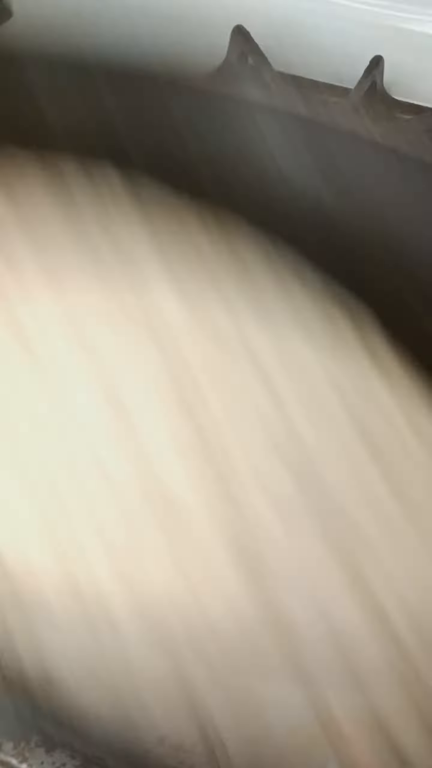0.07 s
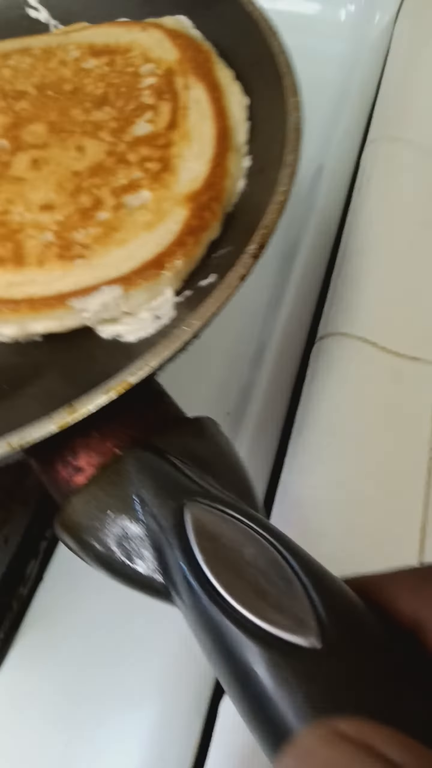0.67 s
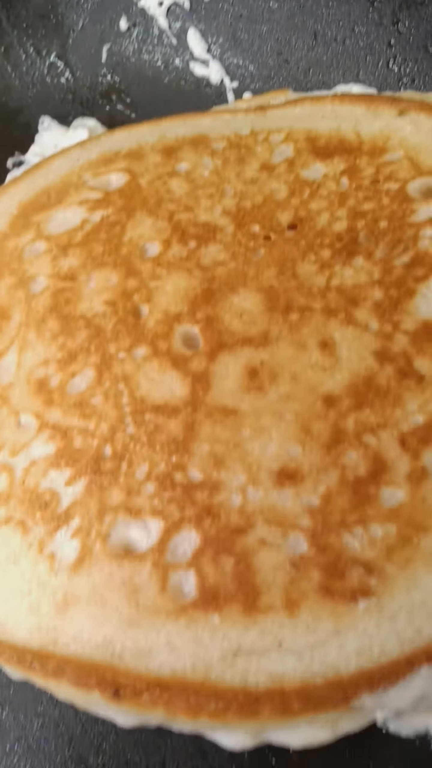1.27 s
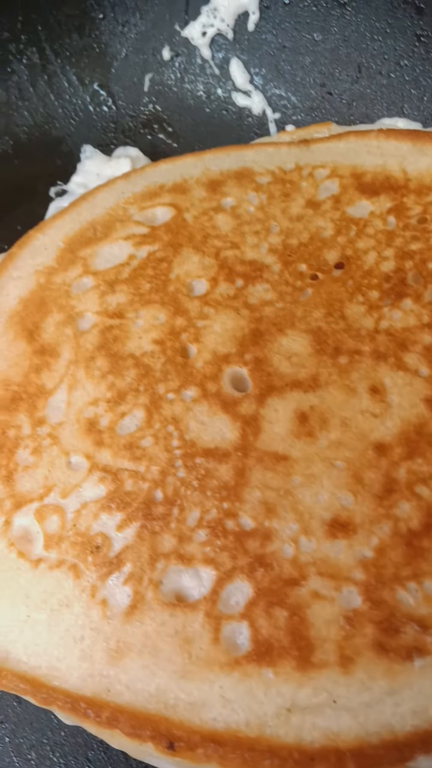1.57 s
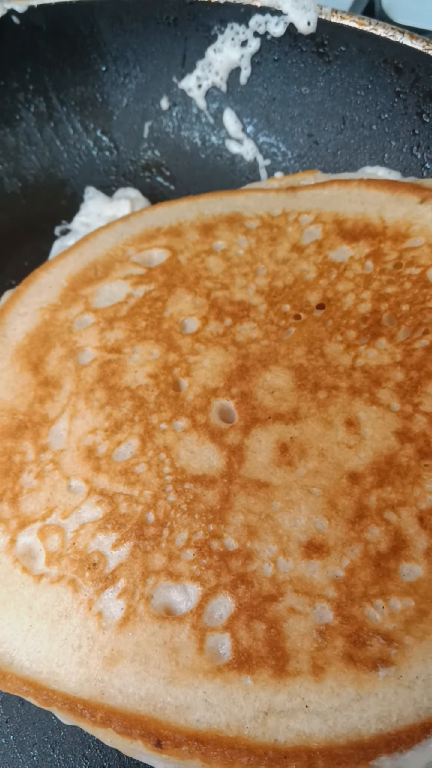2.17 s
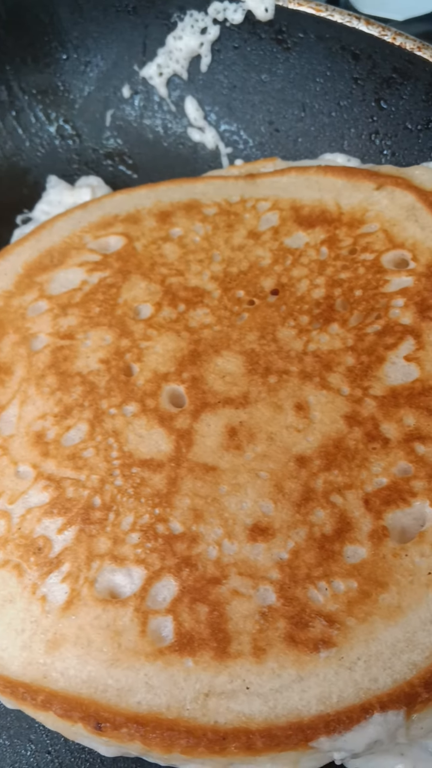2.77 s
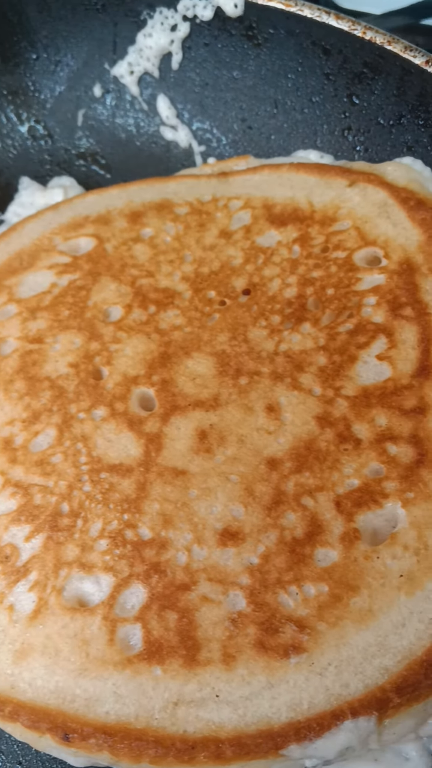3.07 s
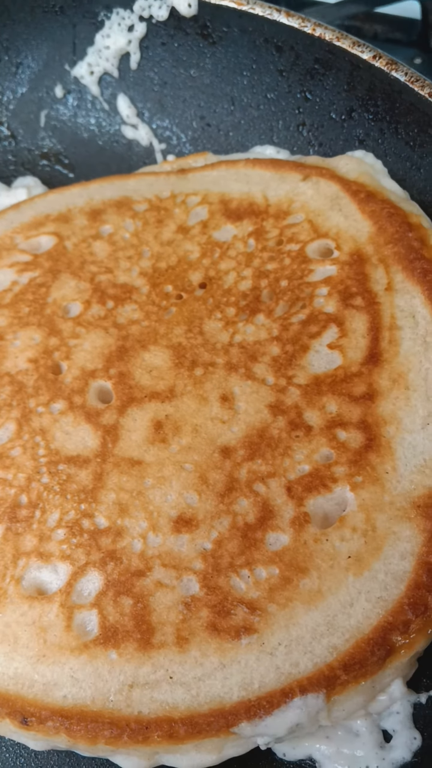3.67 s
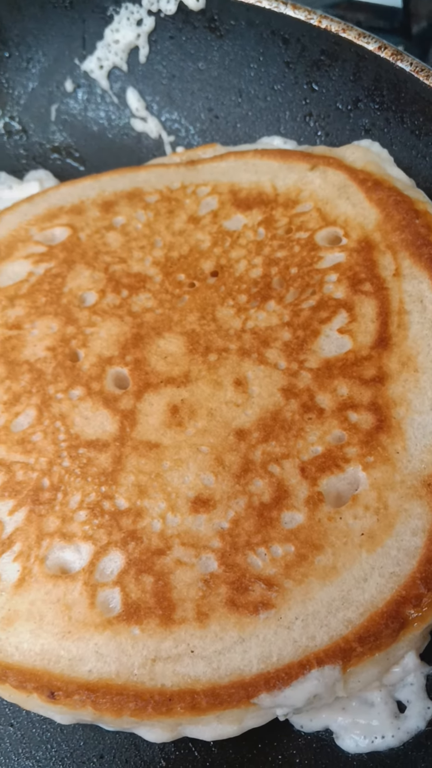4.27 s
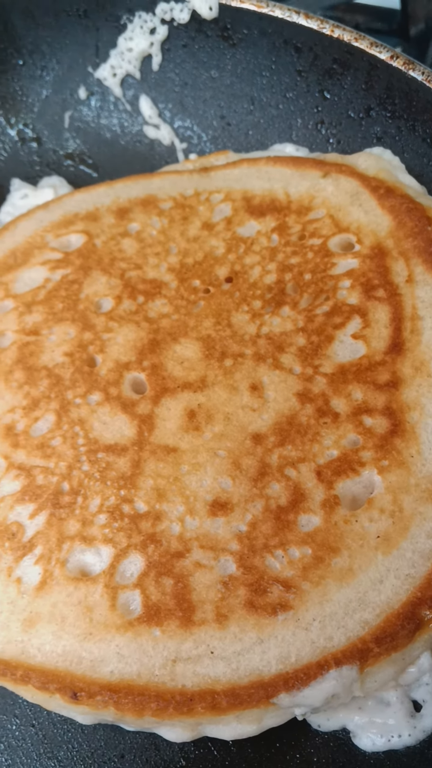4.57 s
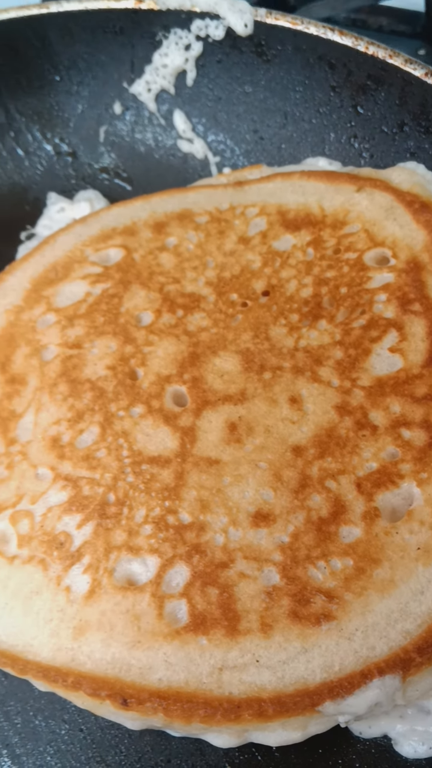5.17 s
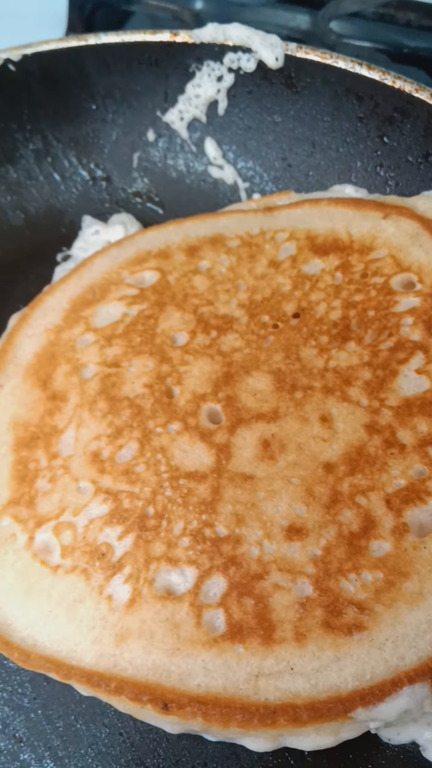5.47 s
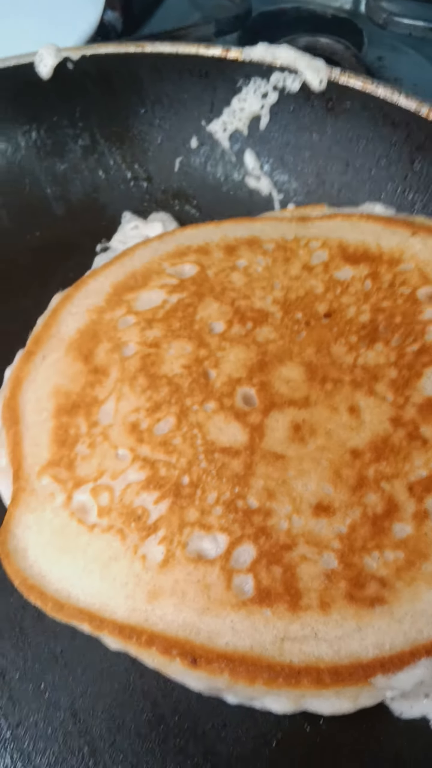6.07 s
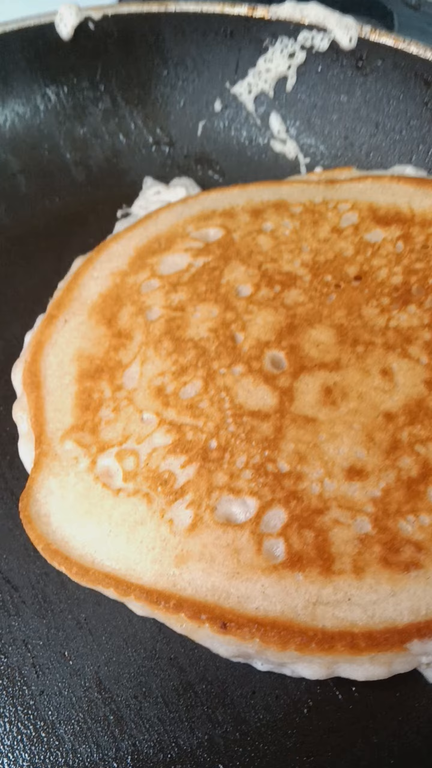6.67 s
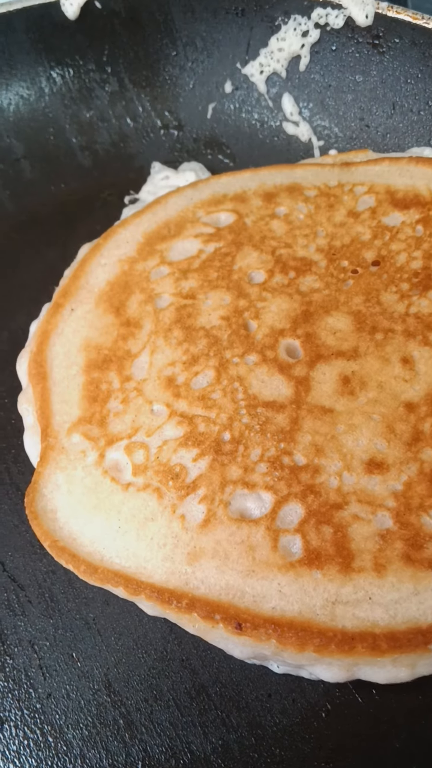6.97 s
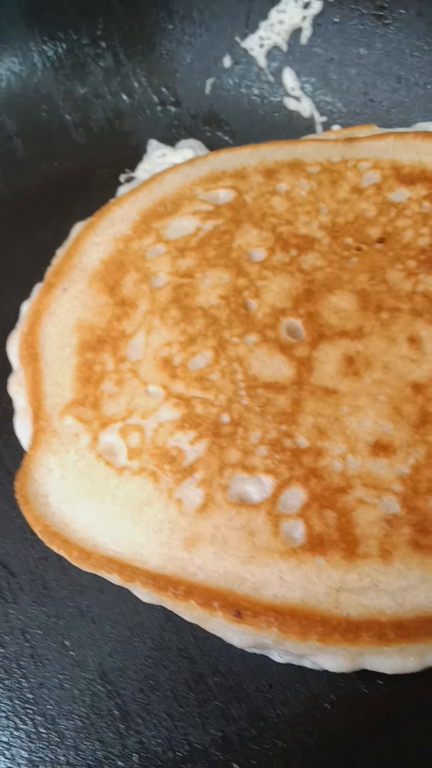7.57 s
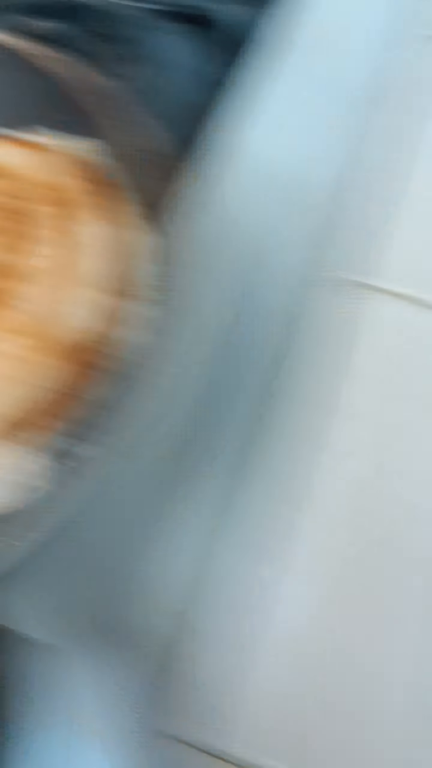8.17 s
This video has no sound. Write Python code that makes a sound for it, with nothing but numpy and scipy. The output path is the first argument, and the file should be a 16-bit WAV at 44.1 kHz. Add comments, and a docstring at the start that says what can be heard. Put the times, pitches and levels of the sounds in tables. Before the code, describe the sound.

A quick rasp and slap of a flipped pancake, then bright sizzling that gradually eases, and the pan briefly bumps the stove grate.

```python
"""A pancake rasps up a frying pan, flies, and lands wet side down with a slap that rings the metal.
The batter sizzles with thousands of bursting bubbles and slowly calms as it dries; single large bubbles
spit. Later the pan bumps on the iron grate and the stove thuds under it. A kitchen hums behind.
The left microphone of a hand-held phone faces the pan, until the phone turns away at the end."""
import sys
import numpy as np
from scipy import signal
from scipy.fft import rfft, irfft, next_fast_len
from scipy.io import wavfile
from scipy.ndimage import uniform_filter1d, map_coordinates

SR = 44100
rng = np.random.default_rng(int(sys.argv[2]) if len(sys.argv) > 2 else 0)


def unload_audio(sound):
    """Save the sound as a 16-bit wav file, at the path given as the first command line argument."""
    columns = np.transpose(np.atleast_2d(sound))
    # keep every value between -1 and 1, then stretch to whole-number steps
    steps = np.round(np.clip(columns, -1, 1) * 32767)
    wavfile.write(sys.argv[1], SR, steps.astype(np.int16))


N = 371322

# batter hitting the pan: (time [s], relative level [dB])
SLAPS = [(0.0938, -16), (0.2097, -18), (0.389, -18), (0.4197, -13), (0.4297, -9.5), (0.437, -.5),
         (0.4386, -6), (.469, -17)]
# wet batter spreading on hot metal: (frequency [Hz], gain [dB])
SQUELCH_EQ = [(40, -42), (90, -8), (210, -12), (350, -17.5), (550, -11.5), (750, -7), (980, -8),
              (1200, 0.5), (1550, -7.5), (2200, -10), (3200, -17.5), (4000, -12.5), (6000, -15.5),
              (8000, -10), (15800, -20.5)]
# the pan shivering under the landed cake: (frequency [Hz], gain [dB])
SHIVER_EQ = [(900, -31), (1500, -12), (1900, 2.5), (2300, -11), (3100, -17), (4000, -3.5), (4800, -13),
             (7000, -20), (10000, -10), (15800, -20)]
# the pan's ring under the cake: (frequency [Hz], level [dB], t60 [s])
LOADED_PAN_MODES = [(1220, -5, 0.09), (1820, -1, 0.2), (2100, -1, .12), (2670, -11, 0.089), (4050, 5, .13),
                    (4300, -7, 0.19)]
# draw back, push, flick: (time of top speed [s], relative rasp [dB], rub [dB], rasp half-width [s])
STROKES = [(0.015, -31, -31.5, 0.03), (.096, -30.5, -31.5, 0.0174), (.144, -17.5, -37.5, 0.0262)]
# the crust's bright rasp: (frequency [Hz], gain [dB])
RASP_EQ = [(80, -36), (200, -13.5), (500, -14.5), (1000, -13), (1600, -5), (2300, -10), (3000, -8),
           (4200, -4.5), (5500, -1), (7100, 2), (11000, 0), (14000, -8), (15800, -16)]
# the dull rub beneath it: (frequency [Hz], gain [dB])
RUB_EQ = [(150, -23), (600, -13), (1000, -2), (1500, -2), (2300, 0), (3500, -9.5), (7000, -33)]
# the pan's ring in the skid: (frequency [Hz], level [dB], t60 [s])
PAN_MODES = [(679, -8.5, 0.34), (1750, -2, 0.076), (2210, -2.5, .22), (4640, -12, 0.16), (5070, -8, .1),
             (5760, 10, 0.062), (6047, -5, 0.081), (6300, -2, 0.088), (6750, 15, 0.065), (7000, 2, .08),
             (7600, 5, 0.088), (7660, -5, .08), (8660, 10, 0.081), (9200, -5, .1), (10100, 1, 0.12),
             (10100, 0, 0.1), (10857, 1, 0.12), (11400, -7, .11)]
# tiny bubbles bursting: (frequency [Hz], gain [dB])
SIZZLE_EQ = [(1500, -33.5), (2500, -12), (3600, -10.5), (4600, -7.5), (5600, -5.5), (7000, -2.5),
             (8100, 1.2), (10000, 0.8), (11200, -2), (12200, -2), (13400, -5.5), (15800, -6.5)]
# steam trapped under the cake: (frequency [Hz], gain [dB])
STEAM_EQ = [(300, -29), (600, -5.5), (1000, 1), (1400, 0.5), (2100, -2.5), (3000, -9.5), (5000, -15),
            (9000, -48)]
# brief swells and dips in the frying; the one after the knock is the pan scraping on the grate:
# (time [s], sizzle gain [dB], steam gain [dB], half-width [s])
SWELLS = [(5.5, 2, -1, 0.18), (6.21, 1.2, 4.5, 0.08), (7.8, -1, 0.5, 0.25)]
# the largest bubbles: (time [s], relative left level [dB], relative right level [dB], pitch [Hz])
SPITS = [(.326, -29, -40, 8950), (0.747, -21, -42, 9050), (1.1738, -27, -45, 8830),
         (1.2117, -23, -27, 10800), (1.3344, -21, -38, 9700), (1.4431, -22.5, -30, 10600),
         (1.5525, -25, -28, 12000), (1.6935, -29, -45, 9380), (1.849, -23, -42, 9080),
         (2.176, -31, -45, 8150), (2.3782, -35, -45, 8300), (2.6868, -36, -33, 9170),
         (2.9221, -28, -45, 9000), (3.3369, -27.5, -45, 8640), (3.3774, -37, -44, 4400),
         (3.9055, -34, -48, 9770), (4.7815, -36, -37, 9570), (5.462, -31, -48, 8680),
         (5.534, -31, -48, 9000), (6.21, -33, -48, 8940), (6.2536, -32.5, -33, 7500),
         (6.293, -33, -45, 8450), (6.5947, -31.5, -46, 9000), (7.3358, -26, -38, 9000),
         (7.6655, -40, -42, 5970), (7.8053, -31.5, -48, 8900)]
# pan against grate, darker when soft: (time [s], thud [dB], relative clack [dB], top of the thud [Hz])
BUMPS = [(.092, -32.5, -42, 152), (.4375, -34.5, -28, 450), (5.703, -35, -75, 98), (5.981, -37, -70, 170),
         (6.0045, -37, -19, 300), (6.083, -46, -33.5, 300), (6.089, -34, -36, 450), (6.182, -62, -45, 300)]
# the iron grate: (frequency [Hz], level [dB], t60 [s])
GRATE_MODES = [(328.3, -18, 0.44), (458.5, -17.5, 0.52), (700, 0, 0.063), (790, 2, 0.029),
               (940, -4.5, 0.036), (1090, -27, 0.18), (1327, -23, .25)]
# the stove's sheet-metal body: (frequency [Hz], level [dB], t60 [s])
STOVE_MODES = [(88, -19, .06), (114, -3, 0.082), (180, 0.5, 0.063), (210, 1.5, 0.045), (289, -3, 0.058)]
# the clack of the contact: (frequency [Hz], gain [dB])
CLACK_EQ = [(40, -47), (150, -19), (400, -5), (560, -5), (750, -0.5), (1000, -4), (1500, -17.5),
            (2500, -29), (5000, -46)]
# the appliances' low drone: (frequency [Hz], gain [dB])
DRONE_EQ = [(20, -61), (38, -43), (55, -11), (85, -1), (125, 0), (170, 0), (210, -4), (260, -6.5),
            (370, -9), (460, -17.5), (600, -15.5), (900, -17), (1500, -37.5)]
# their hum: (frequency [Hz], level [dB])
HUM_TONES = [(59.2, -62), (86.1, -65.5), (118.4, -63), (172, -61), (293, -73), (355.3, -71.5), (527.6, -64)]
# faint steady hiss: (frequency [Hz], gain [dB])
HISS_EQ = [(400, -2.5), (900, 1), (2000, -9), (3300, -11), (4600, -9), (7000, -6.5), (11000, -9.5),
           (15800, -11.5)]
# the kitchen's reverb: (frequency [Hz], t60 before stretching [s])
KITCHEN_DECAY = [(150, 0.4), (1000, 0.25), (4000, 0.38), (14000, 0.1)]
# the right microphone turning to face the pan: (time [s], share [0-1])
TURN = [(0, 0.08), (7.85, 0.06), (8.05, 1), (8.2, 0.9), (8.42, 0.3)]
# flip and knocks on the shaded right side: (frequency [Hz], gain [dB])
KNOCK_SHADE = [(60, 1), (200, -5.5), (450, -8.5), (750, -15.5), (1200, -15.5), (2300, -9.5), (3200, -12),
               (4400, -9), (8000, -10.5), (11000, -12), (15000, -15)]
# frying on the right before the turn: (frequency [Hz], gain [dB])
SIZZLE_SHADE = [(400, -11.5), (800, -22), (1300, -21), (2400, -13), (3200, -12.5), (4400, -6), (6000, -9.5),
                (8000, -18.5), (11000, -15), (15000, -9)]
# frying on the right when fully turned: (frequency [Hz], gain [dB])
FACING_SHADE = [(400, -17), (1200, -16), (2200, -2), (3300, -18), (6000, -28), (9000, -2), (12000, -22),
                (15000, -24)]

LANDING_S, AWAY_S = .438, 8.03  # the cake lies flat; the phone turns away
SQUELCH_DB, SQUELCH_RISE_DB_PER_S, SQUELCH_FALL_DB_PER_S = -25, 330, 520
SHIVER_DB, SHIVER_FALL_DB_PER_S = -27, 300
EMPTY_SIZZLE_DB, EMPTY_STEAM_DB = -49, -55.5  # fat frying before the landing
SIZZLE_DB, SIZZLE_FRESH_DB, SIZZLE_CALM_S = -52, 18.5, 1.76  # settled, boost when wet, drying time constant
STEAM_DB, STEAM_FRESH_DB, STEAM_CALM_S = -61, 10.5, 2.92
CATCH_S = 0.045  # time constant of the batter starting to fry
SIZZLE_AWAY_DB_PER_S, STEAM_AWAY_DB_PER_S = 22, 4  # the treble fades fastest
SPRAY_PER_S, SPRAY_OVER_DB, SPRAY_SPREAD_DB, SPRAY_HZ = 8, 9, 1, 8340
CHATTER_S, CHATTER_GAP_S, CHATTER_LOSS_DB = 6.014, .018, 3.5  # the pan rocks after the hardest knock
TOP_HZ = 15950


def landing():
    """The wet side touches in a few slaps that ring the pan, and squeezes out air and steam."""
    since = np.arange(N) / SR - LANDING_S
    squelch_db = SQUELCH_DB - np.maximum(-SQUELCH_RISE_DB_PER_S * since, SQUELCH_FALL_DB_PER_S * since)
    track = amp(squelch_db) * unit(coloured(grains(rate=5000, spread_db=2), SQUELCH_EQ))
    shiver = (since > 0) * amp(SHIVER_DB - SHIVER_FALL_DB_PER_S * np.abs(since))
    track += shiver * unit(coloured(rng.standard_normal(N), SHIVER_EQ))
    for s, db in SLAPS:
        add(track, s, amp(db + 1) * crest(coloured(snap(splash=0.24, t60=0.0068), SQUELCH_EQ)))
        add(track, s, amp(db - 29) * crest(ring(LOADED_PAN_MODES, attack=.0005)))
    return track


def skid():
    """The crust catches and slips on the pan: a rasp over a dull rub, and the metal rings on."""
    friction = sum(amp(db) * swell(s, half) for s, db, _, half in STROKES)
    pressure = sum(amp(db) * swell(s, 1.12 * half) for s, _, db, half in STROKES)  # outlasts the rasp
    slips = friction * grains(rate=14000, spread_db=3.5)
    rasp = coloured(slips, RASP_EQ)
    metal = signal.oaconvolve(slips, ring(PAN_MODES, attack=.0001))[:N]
    track = np.std(slips) * (amp(2.5) * unit(rasp) + amp(-4.5) * unit(metal))
    track += pressure * unit(coloured(grains(rate=4000, spread_db=3), RUB_EQ))
    # as the cake leaves, the pan springs back in its lowest mode
    add(track, .145, amp(-38.5) * crest(ring(PAN_MODES[:1], attack=0.011)))
    return track


def frying(sizzle_db, steam_db):
    """Thousands of bursting bubbles fizz, fewer and larger ones crackle; trapped steam sputters lower."""
    fizz = patchy(grains(rate=16000, spread_db=2.5), depth_db=1.2) * amp(0.6 * wobble(35))
    pops = grains(rate=300, spread_db=5.5)
    crackle = amp(-5) * unit(signal.oaconvolve(pops, snap(splash=0.46, t60=0.0068))[:N])
    sizzle = amp(sizzle_db) * unit(coloured(fizz + crackle, SIZZLE_EQ))
    steam = amp(steam_db) * unit(coloured(grains(rate=4000, spread_db=3), STEAM_EQ))
    return sizzle + steam


def frying_levels():
    """Sizzle and steam envelopes in dB: both leap at the landing and calm as the batter dries."""
    t = np.arange(N) / SR
    age, away = np.maximum(t - LANDING_S, 0), np.maximum(t - AWAY_S, 0)
    sizzle_db = SIZZLE_DB + SIZZLE_FRESH_DB * np.exp(-age / SIZZLE_CALM_S) - SIZZLE_AWAY_DB_PER_S * away
    steam_db = STEAM_DB + STEAM_FRESH_DB * np.exp(-age / STEAM_CALM_S) - STEAM_AWAY_DB_PER_S * away
    for s, sizzle_gain_db, steam_gain_db, half in SWELLS:
        sizzle_db += sizzle_gain_db * swell(s, half)
        steam_db += steam_gain_db * swell(s, half)
    caught = 1 - np.exp(-age / CATCH_S)
    return (caught * sizzle_db + (1 - caught) * EMPTY_SIZZLE_DB,
            caught * steam_db + (1 - caught) * EMPTY_STEAM_DB)


def patchy(x, depth_db):
    """Random patches of gain across pitch and time keep the fizz's colour shifting."""
    spectrum = signal.stft(x, nperseg=512)[2]
    patches = uniform_filter1d(rng.standard_normal(spectrum.shape), size=7, axis=0)  # across pitch
    patches = uniform_filter1d(patches, size=16, axis=1)  # across time
    return signal.istft(spectrum * amp(depth_db * unit(patches)), nperseg=512)[1][:N]


def burst(hz):
    """A large bubble bursts with a ping of a cycle or two and a little spray; peak 1."""
    t = np.arange(SR // 200) / SR
    ping = t * np.exp(-t * hz / 0.35) * np.sin(2 * np.pi * hz * t)
    pop = signal.fftconvolve(snap(splash=0.12, t60=.01), ping)
    return crest(np.diff(pop))  # so small a source radiates little bass


def spits():
    """The largest bubbles, each reaching the two microphones at its own strength."""
    left, right = np.zeros(N), np.zeros(N)
    for s, left_db, right_db, hz in SPITS:
        add(left, s + .0008, amp(left_db + 5.5) * burst(hz))
        add(right, s + .0008, amp(right_db + 3) * burst(hz))
    return left, coloured(right, [(3000, -3), (7000, -2), (10000, 0)])


def spray(sizzle_db):
    """Smaller bubbles spit at random moments, as strongly as the pan is frying."""
    track = np.zeros(N)
    for at in np.flatnonzero(rng.random(N) < SPRAY_PER_S / SR):
        size, pitch = rng.standard_normal(2)
        peak_db = sizzle_db[at] + SPRAY_OVER_DB + SPRAY_SPREAD_DB * size
        add(track, at / SR, amp(peak_db) * burst(SPRAY_HZ * np.exp(.15 * pitch)))
    return track


def bumps():
    """The pan knocks and briefly chatters on the iron grate, and the stove under it thuds."""
    track = np.zeros(N)
    chatter = [(CHATTER_S + k * CHATTER_GAP_S, -37 - k * CHATTER_LOSS_DB, -39 - k * CHATTER_LOSS_DB, 218)
               for k in range(4)]
    for s, thud_db, clack_db, top_hz in BUMPS + chatter:
        thud_eq = [(25, -24), (75, 0), (top_hz, 0), (2 * top_hz, -12)]
        add(track, s, amp(thud_db) * crest(coloured(ring(STOVE_MODES, attack=0.012), thud_eq)))
        add(track, s, amp(clack_db - 5) * crest(ring(GRATE_MODES, attack=0.00071)))
        add(track, s, amp(clack_db - 4) * crest(coloured(snap(splash=0.027, t60=0.48), CLACK_EQ)))
    return track


def appliances():
    """The background bed: appliances drone and hum, reaching the right first, under a faint hiss."""
    t = np.arange(N) / SR
    hum = sum(amp(db + wobble(2.74)) * np.sin(2 * np.pi * hz * t + .5 * wobble(2.926))
              for hz, db in HUM_TONES)
    drone, stray = (unit(coloured(rng.standard_normal(N), DRONE_EQ, size=16384)) for _ in range(2))
    bed = amp(-55) * coloured(drone, [(60, -5), (170, -1), (350, 3.5), (900, -3.5)]) + hum
    right = coloured(bed + amp(-59.5) * stray, [(60, -6.5), (200, -6.5), (420, 0.5), (900, -8)])
    hiss = np.array([unit(coloured(rng.standard_normal(N), HISS_EQ)) for _ in range(2)])
    return np.array([late(bed, 0.00083), right]) + amp(-61.5) * hiss


def reverb(x, stretch):
    """The kitchen's diffuse tail, each frequency dying at its own speed; stretch scales its length."""
    hz, t, noise = signal.stft(rng.standard_normal(SR // 2), SR, nperseg=256)
    t60 = stretch * along(KITCHEN_DECAY, hz)[:, None]
    tail = signal.istft(noise * amp(-60 * t / t60), SR, nperseg=256)[1]
    return signal.oaconvolve(x, tail / np.linalg.norm(tail))[:N]


def around_phone(direct, scattered):
    """Sound reaching the far microphone: part direct, part by other paths."""
    return .33 * direct + .94 * scattered


def ring(modes, attack):
    """Damped modes after one blow, each at a slightly new strength; a soft blow starts them slowly."""
    t = np.arange(SR // 2) / SR
    tones = sum(amp(db + 2 * rng.standard_normal() - 60 * t / t60) * np.sin(2 * np.pi * hz * t)
                for hz, db, t60 in modes)
    return tones * (1 - np.exp(-t / attack))


def grains(rate, spread_db):
    """Tiny impulses at random moments, mostly small and a few large; rms 1."""
    sizes = amp(spread_db * np.minimum(rng.standard_normal(N), 3.5))
    return unit((rng.random(N) < rate / SR) * sizes * rng.choice([-1, 1], N))


def snap(splash, t60):
    """A sharp impulse and a short noisy tail."""
    t = np.arange(SR // 8) / SR
    return (t == 0) + splash * amp(-60 * t / t60) * rng.standard_normal(len(t))


def swell(s, half):
    """A bell-shaped envelope: 1 at s, 1/e at half seconds either side."""
    return np.exp(-((np.arange(N) / SR - s) / half) ** 2)


def wobble(rate):
    """A smooth random curve, rate knots a second."""
    return map_coordinates(rng.standard_normal(int(N * rate / SR) + 4), [np.arange(N) * rate / SR])


def coloured(x, eq, size=4096):
    """Minimum-phase EQ through (frequency [Hz], gain [dB]) points."""
    cepstrum = irfft(np.log(amp(along(eq, np.fft.rfftfreq(size, 1 / SR)))))
    cepstrum[1:size // 2] *= 2
    cepstrum[size // 2 + 1:] = 0
    return signal.oaconvolve(x, irfft(np.exp(rfft(cepstrum))))[:len(x)]


def along(points, hz):
    """Read a curve on a log frequency axis."""
    knots_hz, values = np.transpose(points)
    return np.interp(np.log(hz + 1), np.log(knots_hz + 1), values)


def amp(db):
    """Decibels to gain."""
    return 10 ** (np.asarray(db) / 20)


def unit(x):
    """Scale to rms 1."""
    return x / np.sqrt(np.mean(x ** 2) + 1e-20)


def crest(x):
    """Scale to peak 1."""
    return x / np.abs(x).max()


def add(track, s, sound):
    """Mix a sound into a track at time s."""
    part = track[max(round(s * SR), 0):][:len(sound)]
    part += sound[:len(part)]


def late(x, seconds):
    """Delay by whole samples."""
    return np.pad(x, (round(seconds * SR), 0))[:len(x)]


def scene():
    """The mix: the pan direct on the left, shaded and scattered on the right, the kitchen around it."""
    slap, knocks = landing(), bumps()
    left_spits, right_spits = spits()
    sizzle_db, steam_db = frying_levels()
    # each microphone favours its own side of the crust and its own bubbles
    near_skid, far_skid = skid(), skid()
    near_fry, far_fry = frying(sizzle_db, steam_db), frying(sizzle_db, steam_db)
    bed = appliances()
    pan = near_skid + slap + knocks + near_fry + left_spits + spray(sizzle_db)
    facing = np.interp(np.arange(N) / SR, *np.transpose(TURN))
    sizzle = around_phone(near_fry, far_fry)
    flip = around_phone(near_skid + slap, far_skid + reverb(slap, stretch=0.1))
    right = (1 - facing) * coloured(sizzle, SIZZLE_SHADE) + facing * coloured(sizzle, FACING_SHADE)
    right += right_spits + coloured(flip + knocks, KNOCK_SHADE)  # low knocks bend round the phone whole
    walls = np.array([late(reverb(pan, stretch=0.86), .005) for _ in range(2)])
    return np.array([late(pan, .00065), right]) + amp(-18.5) * walls + bed


def record(dry):
    """The phone rounds off the highest peaks and keeps nothing above its band limit."""
    rounded = dry / (1 + (dry / .85) ** 6) ** (1 / 6)
    size = next_fast_len(N + SR // 2)
    passband = np.fft.rfftfreq(size, 1 / SR) < TOP_HZ
    return irfft(rfft(rounded, size) * passband, size)[:, :N]


dry = scene()
out = record(dry)
unload_audio(out)
```